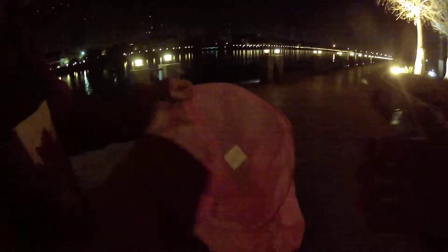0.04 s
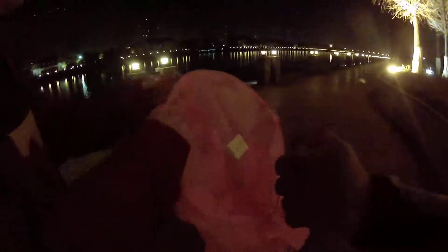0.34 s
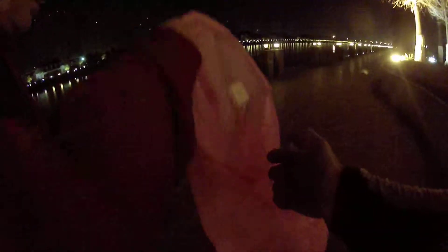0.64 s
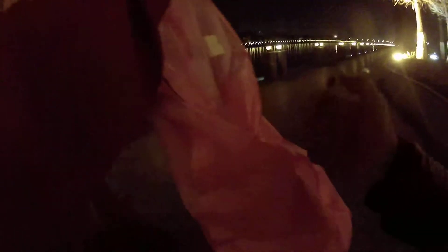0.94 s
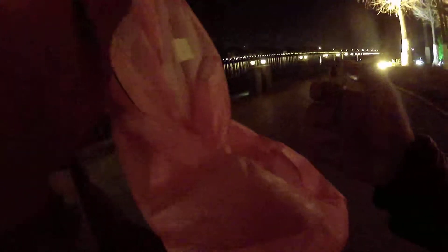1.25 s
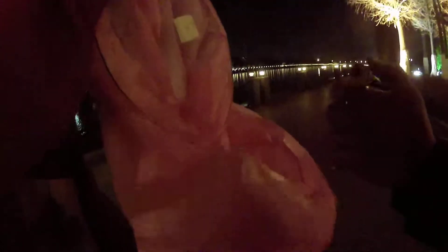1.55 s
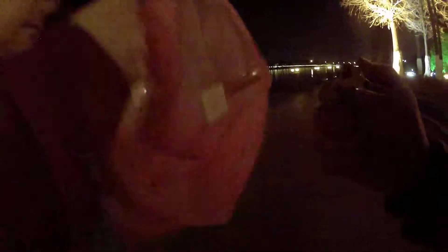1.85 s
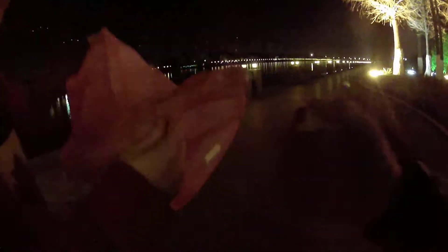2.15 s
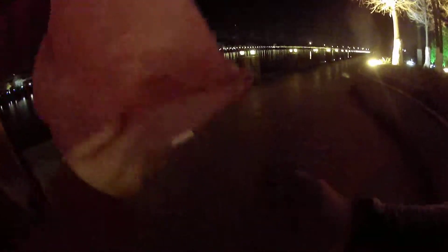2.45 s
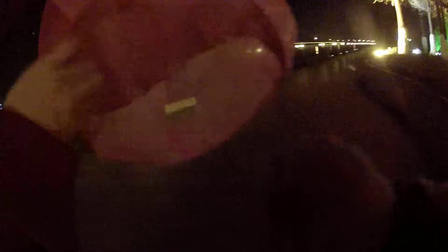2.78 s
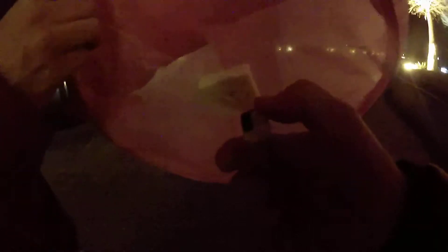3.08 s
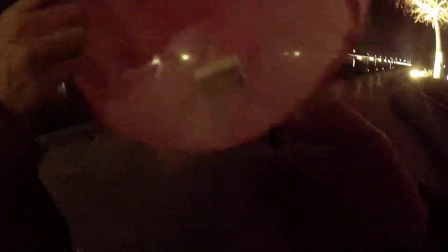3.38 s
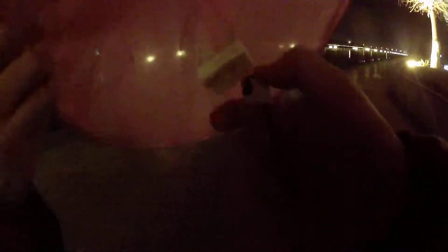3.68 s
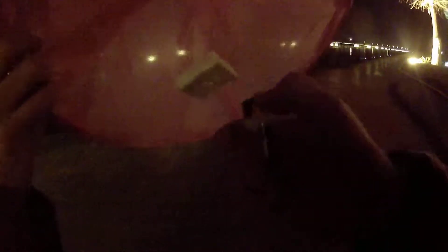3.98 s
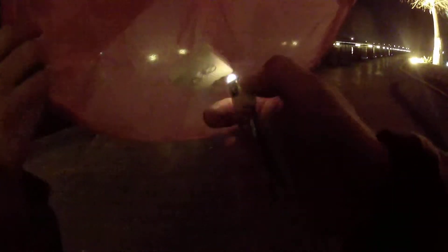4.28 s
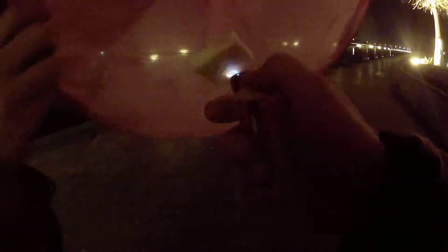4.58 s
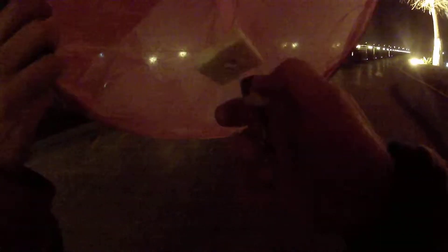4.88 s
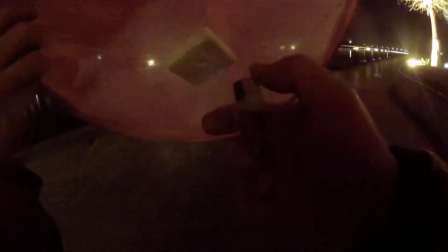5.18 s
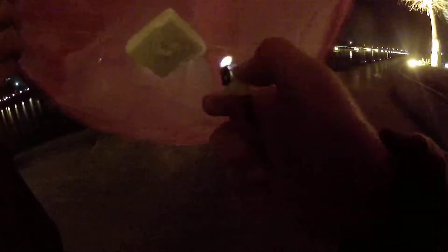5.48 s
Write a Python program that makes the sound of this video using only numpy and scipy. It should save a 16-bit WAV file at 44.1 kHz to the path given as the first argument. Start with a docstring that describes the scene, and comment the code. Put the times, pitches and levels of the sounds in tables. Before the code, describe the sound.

A paper sky lantern is handled close to the microphone on a quiet riverside at night, with a low rumble of distant traffic and a thin hiss throughout. From the start the paper slides and flutters softly, with small crinkles and occasional dry ticks from its frame. Brisker pulls and crackling creases come between about 1.1 and 1.9 seconds, then the rustle turns gentle again. At about 2.8 seconds the bag fills with air in a soft thud and sounds hollow, with a few more bumps and crinkles until 3.5 seconds, then gradually settles. At 4.25 seconds a lighter snaps once, hard and sharp, by far the loudest sound, with a dull knock. At about 5.25 seconds it clicks again, much more softly, followed at once by two faint plastic ticks from its button. The sound is centred and almost mono.

```python
"""Paper slides, flutters and crinkles close to the microphone: a sky lantern is being unfolded on a
quiet riverside at night. Its frame ticks, the bag fills with air and turns hollow, and then the
hammer of a piezo lighter snaps twice, once hard and once softly. Far off, city traffic rumbles.
The microphone hears through two ports in a camera's case, which notches the treble; almost mono."""
import sys
import numpy as np
from scipy import signal
from scipy.fft import rfft, irfft, next_fast_len
from scipy.io import wavfile
from scipy.ndimage import map_coordinates

SR = 44100
rng = np.random.default_rng(int(sys.argv[2]) if len(sys.argv) > 2 else 0)


def unload_audio(sound):
    """Save the sound as a 16-bit wav file, at the path given as the first command line argument."""
    columns = np.transpose(np.atleast_2d(sound))
    # keep every value between -1 and 1, then stretch to whole-number steps
    steps = np.round(np.clip(columns, -1, 1) * 32767)
    wavfile.write(sys.argv[1], SR, steps.astype(np.int16))


N = 243720

# spectrum of the loose paper sheet as it flutters or pops: f/Hz, level/dB
SHEET_SPECTRUM = [(90, -25), (170, 0), (260, -1.5), (420, -3), (680, -6.5), (830, -14), (1050, -29.5),
                  (1600, -30), (2500, -63)]


def amp(db):
    """Decibels to gain."""
    return 10 ** (np.asarray(db) / 20)


def unit(x):
    """x scaled to rms 1."""
    return x / np.sqrt(np.mean(x ** 2) + 1e-20)


def along(points, hz):
    """(f/Hz, value) points read on a log frequency axis."""
    f, values = np.transpose(points)
    return np.interp(np.log(hz + 1), np.log(f + 1), values)


def curves(rows):
    """One value per sample for each column after the time."""
    times, *columns = np.transpose(rows)
    return [np.interp(np.arange(N) / SR, times, column) for column in columns]


def wobble(per_second):
    """A smooth curve through random knots."""
    knots = rng.standard_normal(int(N * per_second / SR) + 4)
    return map_coordinates(knots, [np.arange(N) * per_second / SR])


def filtered(x, response):
    """x through a filter given as a function of frequency."""
    n = x.shape[-1]
    padded = next_fast_len(n + SR // 4)
    return irfft(rfft(x, padded) * response(np.fft.rfftfreq(padded, 1 / SR)), padded)[..., :n]


def resonance(f, hz, width):
    """Causal response of one resonance."""
    return 1j * f * width / (hz * hz - f * f + 1j * f * width)


def add(track, s, sound):
    """Mix a sound into the track at time s."""
    part = track[round(s * SR):][:len(sound)]
    part += sound[:len(part)]


def coloured(x, spectrum):
    """x shaped by a spectrum, at rms 1."""
    return unit(filtered(x, lambda f: amp(along(spectrum, f))))


def grains(per_second, spread_db):
    """Tiny slips of random size at random moments, at rms 1."""
    sizes = amp(spread_db * np.clip(rng.standard_normal(N), -2, 2)) * rng.choice([-1, 1], N)
    return unit(sizes * (rng.random(N) < per_second / SR))


def swell(start, end, rise_s, fall_s):
    """Envelope that holds from start to end; it rises 10 dB per rise_s and falls 10 dB per fall_s."""
    t = np.arange(N) / SR
    return amp(-10 * (np.maximum(start - t, 0) / rise_s + np.maximum(t - end, 0) / fall_s))


def handling():
    """Level in dB that drives the paper sounds: rubs, pulls and plain holding add in power."""
    # the hands keep the paper moving gently: start/s, end/s, level/dB
    gentle_rubs = [(-.1, 1.29, -66.8), (1.49, 3.15, -67.1), (3.47, 4.26, -65.5)]
    # pulls that unfold the sheet: peak t/s, level/dB, 10 dB rise/s, 10 dB fall/s
    brisk_pulls = [(0.0, -65, .1, .08), (0.35, -66, .1, .08), (0.76, -61, .2, .16),
                   (1.125, -58.5, .08, .085), (1.28, -56, .055, .042), (1.55, -51, .009, .16),
                   (1.815, -54.2, .085, .135), (2.62, -70, .08, .1), (3.12, -68.5, .1, .1),
                   (5.18, -71.5, .06, .12), (5.5, -76, .15, .15)]
    held_db = -79
    rubs = [amp(db) * swell(start, end, rise_s=.13, fall_s=.11) for start, end, db in gentle_rubs]
    pulls = [amp(db) * swell(s, s, rise_s, fall_s) for s, db, rise_s, fall_s in brisk_pulls]
    return 10 * np.log10(np.sum(np.square(rubs + pulls), axis=0) + amp(held_db) ** 2)


def sliding(handling_db):
    """Close up, sliding paper hisses in dense slips, hollowed by a reflection off the sheet."""
    # spectrum of paper on paper: f/Hz, level/dB
    friction_spectrum = [(400, -20.5), (900, -17), (1250, -5), (1650, -8.5), (2030, 3), (2900, 0),
                         (3500, -3.5), (4800, -10.5), (6500, -17), (9300, -9), (14200, -14), (15100, -12.5),
                         (15600, -45)]
    # the hiss glances off the moving sheet: t/s, delay/ms, share reflected
    reflection_path = [(0, 1.01, .15), (.8, 1.01, .4), (1.6, .9, .05), (2.6, 1.08, .3), (3.4, 1.02, .14),
                       (3.8, 1.33, .22)]
    delay_ms, share = curves(reflection_path)
    slips = unit(rng.standard_normal(N) + .98 * grains(per_second=1800, spread_db=4.5))
    hiss = coloured(slips, friction_spectrum)
    reflected = np.interp(np.arange(N) - delay_ms * SR / 1000, np.arange(N), hiss)
    return amp(handling_db + 1.78 + .6 * wobble(30)) * unit(hiss + share * reflected)


def fluttering(handling_db):
    """The handled sheet flutters; once the bag opens it also sounds hollow, until it settles."""
    # spectrum of the open bag: f/Hz, level/dB
    bag_spectrum = [(90, -24), (170, -2), (260, -1), (420, -1), (680, -1.5), (830, -9.5), (1050, -28),
                    (1600, -34), (2500, -63)]
    open_s, rise_s, open_db, settle_db_per_s = 2.815, .22, 9.4, 7
    gentle_db, db_per_handling_db = -66, .48
    since_open = np.arange(N) / SR - open_s
    bag_gain = np.clip(since_open / rise_s, 0, 1) * amp(open_db - settle_db_per_s * since_open)
    sheet = coloured(grains(per_second=4400, spread_db=3), SHEET_SPECTRUM)
    bag = coloured(grains(per_second=4400, spread_db=3), bag_spectrum)
    flutter_db = -58 + db_per_handling_db * (handling_db - gentle_db) + .96 * wobble(24)
    return amp(flutter_db) * (sheet + bag_gain * bag)


def riverside_night():
    """Far traffic rumbles under a thin, even hiss; the ports add faint noise in opposite polarity."""
    # spectrum of the distant city: f/Hz, level/dB
    traffic_spectrum = [(12, -29), (20, -13), (70, -4), (202, -10.5), (255, -13.5), (290, -12.5),
                        (323, -16.5), (360, -18.5), (489, -25), (665, -24), (905, -28.5), (1500, -46.5),
                        (1950, -73), (3300, -120)]
    # spectrum of the background hiss: f/Hz, level/dB
    hiss_spectrum = [(700, -16.5), (1200, 5), (2000, 5.5), (3200, -2.5), (5000, -4), (7500, -7.5),
                     (12000, -9), (15100, -11.5), (15600, -43.5)]
    # spectrum of the noise at the microphone ports: f/Hz, level/dB
    port_spectrum = [(25, -3), (150, -6), (400, -12), (800, -15.5), (1500, -17), (5000, -17), (7500, -20),
                     (9500, -47)]
    traffic = amp(-52.5 + .7 * wobble(1.7)) * coloured(rng.standard_normal(N), traffic_spectrum)
    hiss = amp(-70.5) * coloured(rng.standard_normal(N), hiss_spectrum)
    ports = amp(-81.5) * coloured(rng.standard_normal(N), port_spectrum)
    return traffic + hiss + np.array([ports, -ports])


def billows():
    """Soft thuds as the paper bag fills with air or is bumped."""
    # billows and bumps: t/s, level/dB, f/Hz, t60/s
    thuds = [(0.01, -51, 60, .9), (0.27, -47, 1000, 0.035), (0.8, -55, 320, .5), (1.774, -48.5, 358, 0.4),
             (2.818, -38.5, 190, 0.14), (2.828, -41, 460, 0.25), (3.018, -46, 560, .06),
             (3.456, -48.5, 58, 0.61), (3.477, -44, 480, 0.06), (4.256, -41, 210, 0.14)]
    out, t = np.zeros(N), np.arange(SR // 2) / SR
    for s, db, hz, t60 in thuds:
        push = unit(filtered(rng.standard_normal(len(t)), lambda f: resonance(f, hz, width=hz) ** 3))
        add(out, s, push * amp(db - 60 * t / t60) * (1 - np.exp(-t / .002)))
    return out


def creases(handling_db):
    """A crease snaps over with tiny ticks and a dull pop; small ones come by chance, as loud as the
    handling allows."""
    # the main creases: t/s, level/dB
    main_creases = [(0.2728, -47.5), (1.2494, -46.5), (1.285, -44), (1.5422, -43), (1.77, -49),
                    (3.0217, -45.5), (3.094, -52), (3.463, -52)]
    # spectrum of a crease's ticks: f/Hz, level/dB
    crinkle_spectrum = [(700, -18), (1500, -14), (2300, 7), (5000, -5), (7000, -6), (10000, -6),
                        (15000, -5), (15600, -45)]
    small_per_s, over_handling_db, spread_db = 9, 4.5, 2.2
    tick_db, tick_t60, pop_db, pop_t60 = -2, .016, -2.5, .064
    tick_envelope, pop_envelope, t = np.zeros(N), np.zeros(N), np.arange(SR // 20) / SR
    small_db = handling_db + over_handling_db + spread_db * rng.standard_normal(N)
    small_creases = [(i / SR, small_db[i]) for i in np.flatnonzero(rng.random(N) < small_per_s / SR)]
    for s, db in main_creases + small_creases:
        add(tick_envelope, s, amp(db + tick_db - 60 * t / tick_t60) * (1 - np.exp(-t / .00049)))
        add(pop_envelope, s, amp(db + pop_db - 60 * t / pop_t60))
    ticks = tick_envelope * coloured(grains(per_second=15000, spread_db=1), crinkle_spectrum)
    pops = pop_envelope * coloured(rng.standard_normal(N), SHEET_SPECTRUM)
    return ticks + pops


def frame_ticks():
    """The lantern's frame ticks now and then under the strain."""
    # thin, dry ticks: t/s, level/dB
    ticks = [(0.9374, -57), (1.3874, -52), (2.0924, -57), (2.612, -54.5), (5.1572, -56)]
    # spectrum of the frame: f/Hz, level/dB
    frame_spectrum = [(1200, -30), (2200, -7), (3500, -14), (5000, -2), (6000, 4), (7000, -1), (9000, -16),
                      (14000, -22)]
    t60 = .014
    envelope, t = np.zeros(N), np.arange(SR // 20) / SR
    for s, db in ticks:
        add(envelope, s, amp(db - 60 * t / t60) * (1 - np.exp(-t / .0005)))
    return envelope * coloured(rng.standard_normal(N), frame_spectrum)


def ringing(modes, t):
    """A struck body: one decaying sine per mode."""
    return sum(amp(db - 60 * t / t60) * np.sin(2 * np.pi * hz * t) for hz, db, t60 in modes)


def hammer_blow(t, ring_db, hardness):
    """One blow of the piezo hammer: a dead crack and a short ring of the lighter's shell."""
    # heavily damped parts that the hammer shakes: f/Hz, width/Hz, hard-hit level/dB, soft-hit level/dB
    damped_modes = [(2480, 1240.0, 23.5, 21.5), (2874, 810.0, 17, 23.5), (5000, 950.0, 16.5, 8.5),
                    (7030.0, 990, 14.5, 6), (9600, 1100.0, 12, 12.5), (14570.0, 1040.0, 8.5, 8.5),
                    (16030.0, 590.0, -0.0, 2.5)]
    # ring of the shell and steel hood: f/Hz, level/dB, t60/s
    shell_modes = [(3190.0, -10.5, 0.012), (3720.0, -24.5, 0.011), (8740.0, -16.5, 0.012),
                   (15110.0, -26.5, 0.014)]

    def body(f):
        return sum(amp(soft_db + hardness * (hard_db - soft_db)) * resonance(f, hz, width) ** 3
                   for hz, width, hard_db, soft_db in damped_modes)

    blow = filtered(signal.unit_impulse(len(t)), body)
    # the shell takes up its ring as the crack peaks
    add(blow, .00059, amp(ring_db) * ringing(shell_modes, t) * (1 - np.exp(-t / .0003)) ** 2)
    # so small a body radiates no bass
    return signal.sosfilt(signal.butter(N=6, Wn=1800, btype="high", fs=SR, output="sos"), blow)


def lighter():
    """Near the microphone the hammer snaps and knocks the hand; lantern and ground echo the snap."""
    # the two snaps: t/s, level/dB, relative shell ring/dB, knock/dB, hardness (0-1)
    snaps = [(4.2503, -.7, 0, -29, 0.84), (5.2446, -21.6, -3, -42, 0.3)]
    # dull knock of the lighter into the hand: f/Hz, level/dB, t60/s
    knock_modes = [(230, -4, .025), (640, -4, .007), (1150, -9, .005)]
    # spectrum of the jolt at the microphone ports: f/Hz, level/dB
    jolt_spectrum = [(30, 0), (100, -2.5), (300, -11), (1000, -33), (3000, -52), (5000, -26), (7000, -30),
                     (9000, -40), (12000, -60)]
    echo_s, jolt_db, jolt_t60 = .0069, -33.5, .055
    out, jolt_envelope, t = np.zeros(N), np.zeros(N), np.arange(SR // 8) / SR
    knock = ringing(knock_modes, t)
    for s, db, ring_db, knock_db, hardness in snaps:
        blow = amp(db) * hammer_blow(t, ring_db, hardness)
        scatter = rng.standard_normal(len(t)) * (amp(-60 * t / .04) + amp(-14 - 60 * t / .17))
        diffuse_echo = signal.fftconvolve(blow, scatter / np.linalg.norm(scatter))
        add(out, s, blow + amp(knock_db) * knock)
        add(out, s + echo_s, amp(-26) * blow)
        add(out, s + echo_s / 2, amp(-27.5) * diffuse_echo)
        add(jolt_envelope, s, hardness ** 2 * amp(db + jolt_db - 60 * t / jolt_t60))
    # the sudden pressure step jolts the two ports in opposite ways
    jolt_rms = np.sqrt(np.mean(jolt_envelope ** 2))
    jolt = jolt_rms * coloured(jolt_envelope * rng.standard_normal(N), jolt_spectrum)
    return out + np.array([jolt, -jolt])


def button():
    """The lighter's held button settles with two faint, dead plastic ticks."""
    # ticks of the button: t/s, level/dB, lower f/Hz, upper f/Hz
    ticks = [(5.3009, -42, 3050, 8940), (5.3184, -43, 2050, 10000)]
    t60 = .0107
    out, t = np.zeros(N), np.arange(SR // 20) / SR
    for s, db, lower_hz, upper_hz in ticks:
        plastic = lambda f: resonance(f, lower_hz, 800) ** 2 + .35 * resonance(f, upper_hz, 1200) ** 2
        tick = unit(filtered(rng.standard_normal(len(t)), plastic))
        add(out, s, tick * amp(db - 60 * t / t60) * (1 - np.exp(-t / .0007)))
    return out


def scene():
    """Lantern and lighter sit close and dead centre, with the city far behind."""
    handling_db = handling()
    paper = sliding(handling_db) + fluttering(handling_db) + creases(handling_db)
    lantern = paper + frame_ticks() + billows()
    return lantern + lighter() + button() + riverside_night()


def record(dry):
    """The case notches the treble; the camera mirrors a trace of the lows high up and cuts the top."""
    # bands that the camera's case shuts out: f/Hz, half width/Hz, level/dB
    case_notches = [(5970, 490, -10), (11830, 1700, -10)]
    # the low band that is mirrored: f/Hz, level/dB
    low_band = [(50, -30.5), (300, -7), (700, 6.5), (1000, -7), (1500, -44)]
    mirror_hz, silent_above_hz, roll_off_hz = 12000, 16750, 400

    def case(f):
        return amp(sum(db * np.exp(-((f - hz) / width) ** 4) for hz, width, db in case_notches))

    cased = filtered(dry, case)
    lows = filtered(dry, lambda f: amp(along(low_band, f)))
    mirrored = amp(-21.5) * lows * np.cos(2 * np.pi * mirror_hz * np.arange(N) / SR)
    return filtered(cased + mirrored, lambda f: np.clip((silent_above_hz - f) / roll_off_hz, 0, 1) ** 2)


dry = scene()
out = record(dry)
unload_audio(out)
```